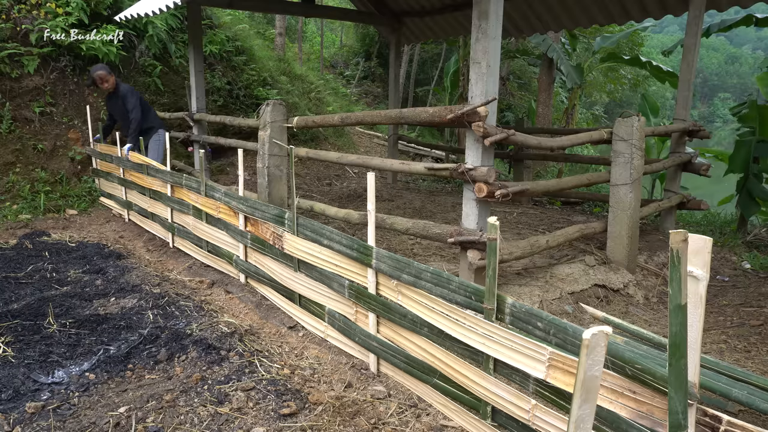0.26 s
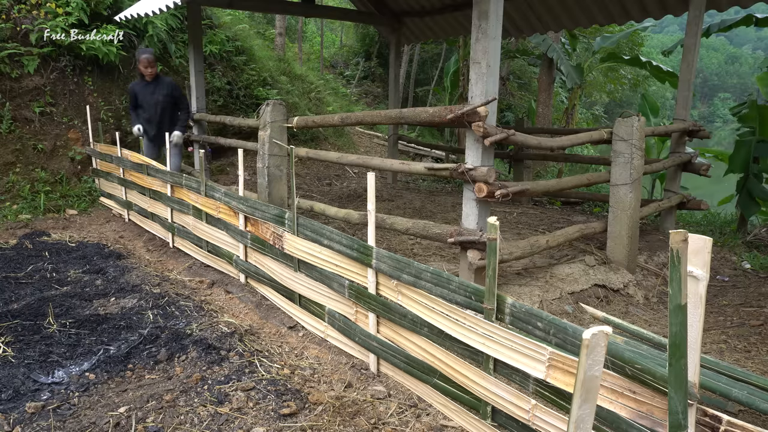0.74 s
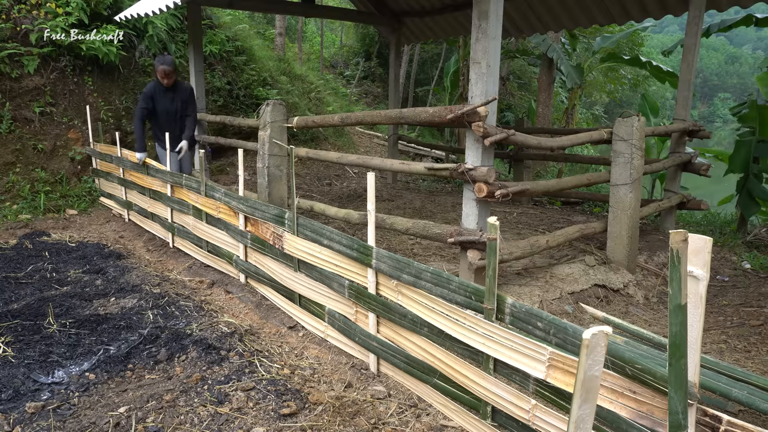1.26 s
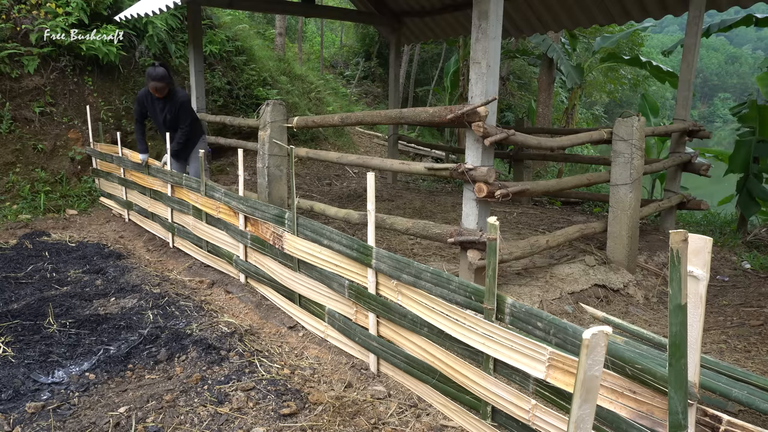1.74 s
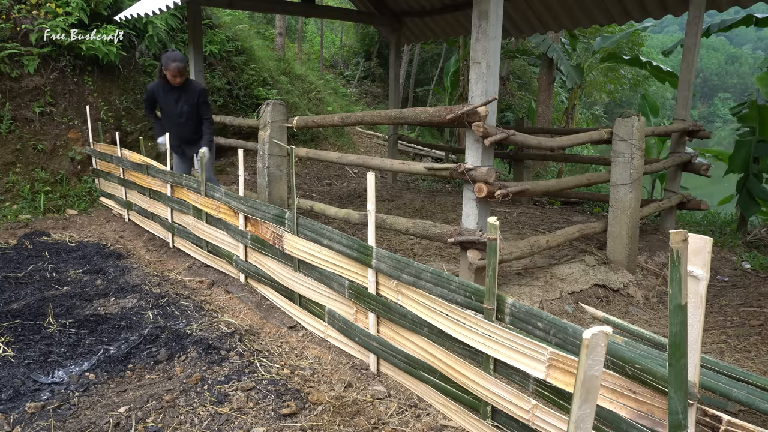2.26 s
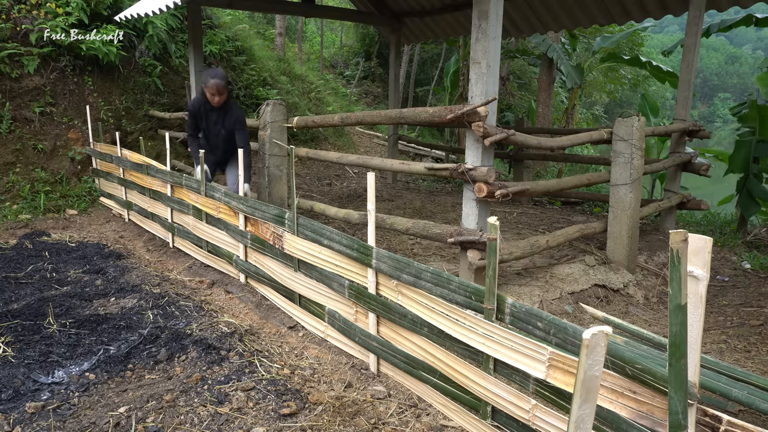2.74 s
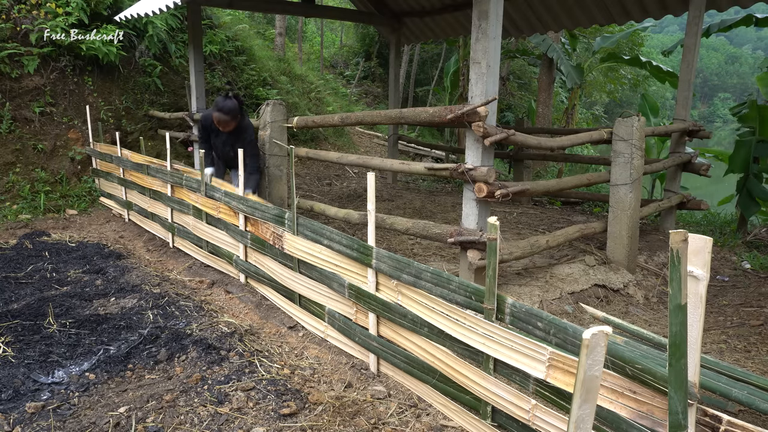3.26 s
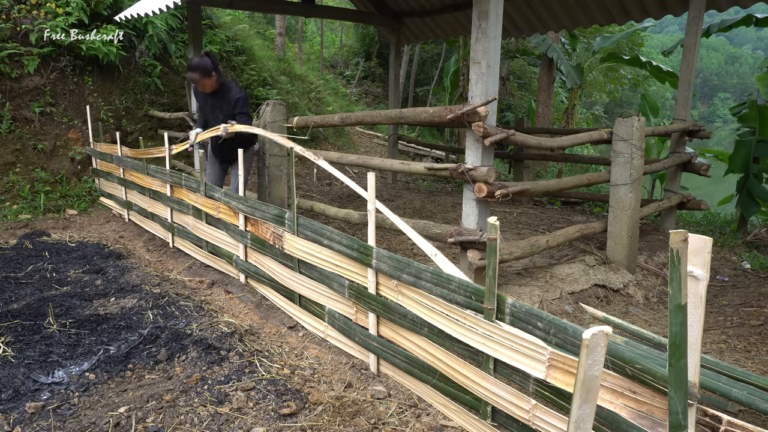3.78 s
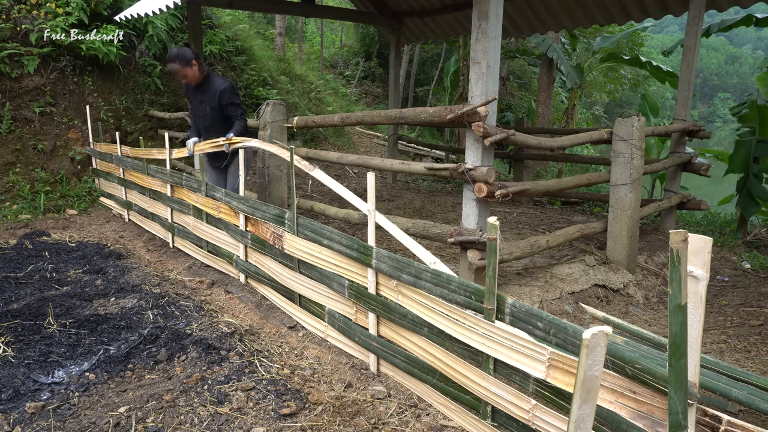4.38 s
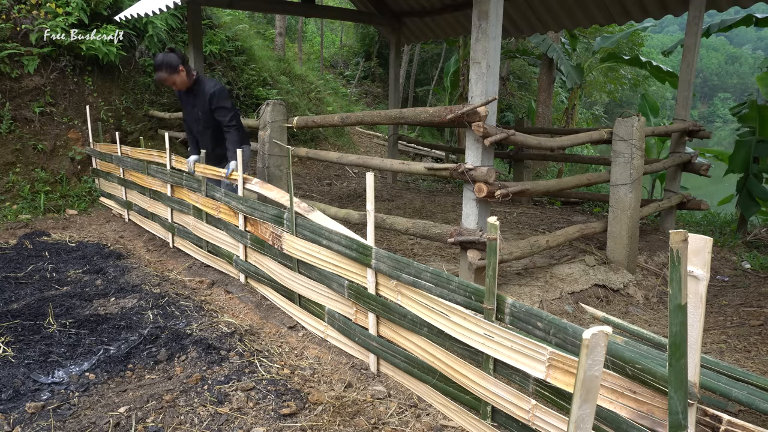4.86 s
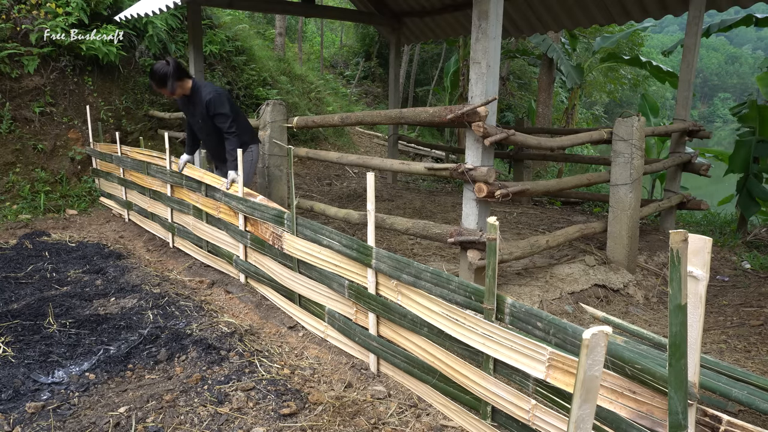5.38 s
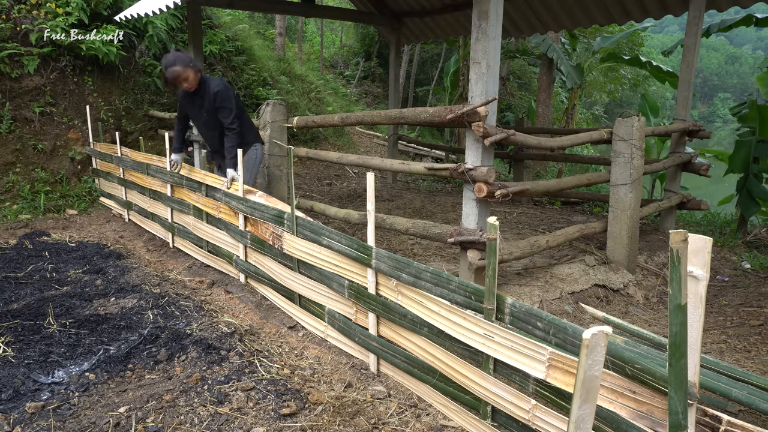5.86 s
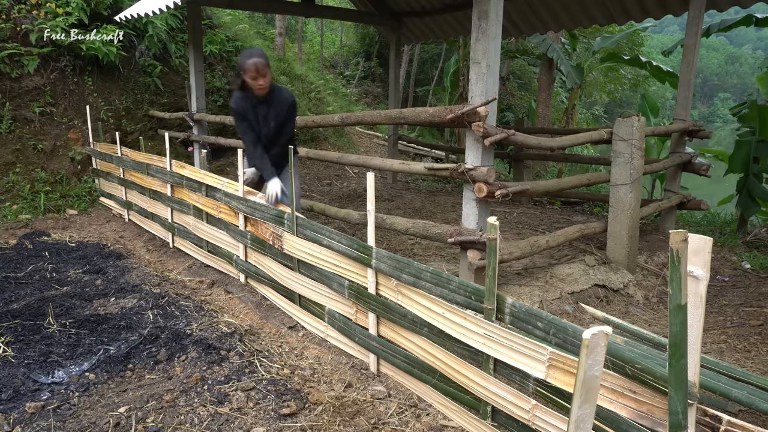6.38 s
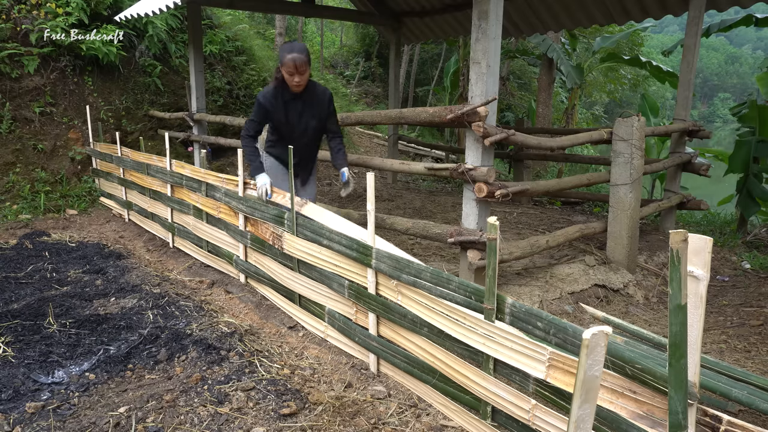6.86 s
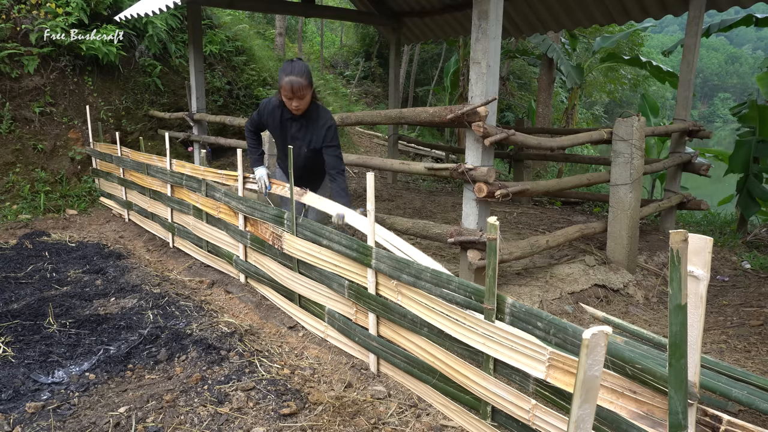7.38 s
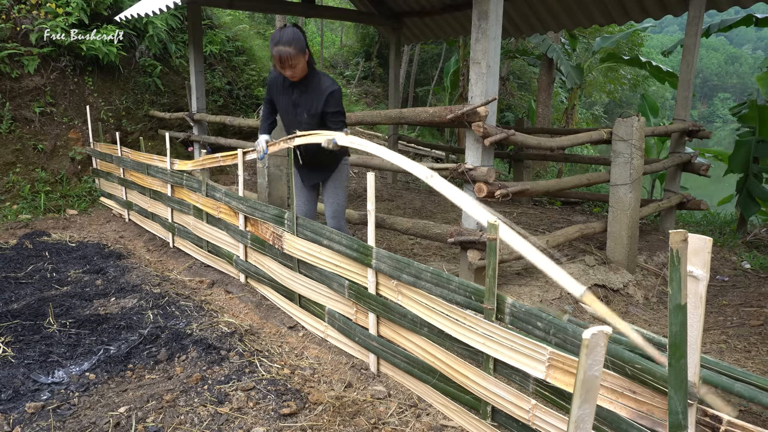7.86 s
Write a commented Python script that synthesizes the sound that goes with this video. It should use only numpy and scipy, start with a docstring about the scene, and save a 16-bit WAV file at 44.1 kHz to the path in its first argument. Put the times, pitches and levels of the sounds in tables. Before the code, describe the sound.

Split bamboo strip rasps, cracks and squeaks as it is bent between fence stakes, then clatters down hollowly over a high insect drone.

```python
"""A split bamboo strip is woven between the stakes of a fence, under an open shed roof on a quiet hillside.
Filtered noise makes still air and an insect chorus all through; pushes of the strip fizz and rasp as grains of noise.
Its fibres crack in short noise bursts, its skin squeaks as narrow bands of noise, and one dry crackle is clicks.
It knocks on hollow slats, made of noise bursts and decaying sines; a far bird whistles in gliding bands of noise.
At last the free end clatters down in a run of knocks. The roof adds a faint echo to the cracks, knocks and squeaks."""
import sys
import numpy as np
from scipy import signal
from scipy.fft import rfft, irfft
from scipy.io import wavfile

SR = 44100
rng = np.random.default_rng(int(sys.argv[2]) if len(sys.argv) > 2 else 0)


def transcribe(signal):
    """Save signal, clipped to [-1, 1], as a 16-bit WAV file at the path in sys.argv[1]."""
    frames = np.atleast_2d(signal).T
    limited = np.clip(frames, -1, 1)
    pcm = np.round(limited * 32767).astype(np.int16)
    wavfile.write(sys.argv[1], SR, pcm)


N = 358091
TIME = np.arange(N) / SR  # seconds

# tone colour of a blow on the fence: pitch_hz [Hz], level_db [dB per Hz]
BLOW_COLOUR = [(40, -31.5), (130, -5), (300, -3), (620, -0.5), (1000, -2.5), (2200, -8), (3500, -10),
               (6000, -9.5), (15000, -15.5)]


def gain_of(db):
    """Turns decibels into a factor."""
    return 10 ** (np.asarray(db) / 20)


def evened(x):
    """Scales a signal to an rms (average strength) of 1."""
    return x / np.sqrt(np.mean(x ** 2) + 1e-20)


def read(points, hz):
    """Reads a curve of (Hz, value) points on a log-frequency axis."""
    f, value = np.transpose(points)
    return np.interp(np.log(hz + 1), np.log(f + 1), value)


def add(mix, start_s, sound):
    """Mixes a sound in at a given time."""
    part = mix[:, max(round(start_s * SR), 0):][:, :sound.shape[1]]
    part += sound[:, :part.shape[1]]


def placed(pair, same, pan_db):
    """Makes two unrelated signals partly alike (same: 0 to 1) and pans them; positive pan_db is left."""
    same = np.clip(same, 0, 1)
    right = same * pair[0] + np.sqrt(1 - same ** 2) * pair[1]
    return np.array([pair[0] * gain_of(pan_db / 2), right * gain_of(-pan_db / 2)])


def coloured(x, *spectra, ripple_db=0, size=2048, order=24):
    """Filters without pre-echo; random ripple stands for the resonances of the spot that is touched."""
    hz = np.fft.rfftfreq(size, 1 / SR)
    ripple = evened(np.convolve(rng.standard_normal(len(hz)), np.hanning(order), "same"))
    total_db = sum(read(points, hz) for points in spectra) + ripple_db * ripple
    log_gain = np.log(gain_of(total_db))
    # minimum phase: the phase follows from the log gain around the whole circle
    circle = np.concatenate([log_gain, log_gain[-2:0:-1]])
    taps = np.fft.ifft(np.exp(np.conj(signal.hilbert(circle)))).real
    return signal.oaconvolve(x, taps[None], axes=1)[:, :x.shape[1]]


def sized(x, db):
    """Gives a hit the energy that a steady sound at this level has in 10 ms."""
    energy = np.mean(np.sum(x ** 2, 1))
    return gain_of(db) * x * np.sqrt(.01 * SR / energy)


def whistle(length_s, start_hz, end_hz, width_hz):
    """A fuzzy tone: noise in one gliding narrow band, faded in and out."""
    n = int(length_s * SR)
    band = 1 / (1 + (2 * np.fft.fftfreq(n, 1 / SR) / width_hz) ** 4)
    wobble = np.fft.ifft(np.fft.fft(rng.standard_normal((2, n))) * np.sqrt(band))
    turn = np.exp(2j * np.pi * np.cumsum(np.linspace(start_hz, end_hz, n)) / SR)
    fade = signal.windows.tukey(n, min(.6, 0.38 / length_s))
    return evened((wobble * turn).real * fade)


def scattered(x, decay_s, same):
    """The same energy thrown back by the slats around, within a few hundredths of a second."""
    t = np.arange(SR // 8) / SR
    echoes = placed(rng.standard_normal((2, len(t))), same, 0) * np.exp(-t / decay_s)
    return signal.fftconvolve(x, echoes / np.linalg.norm(echoes[0]), axes=1)[:, :x.shape[1]]


def slips(length_s, release_s, grain_db, same, pan_db):
    """A burst of noise in tiny uneven slips, the first ones strongest."""
    t = np.arange(SR // 4) / SR
    # a new random strength every 20 samples
    uneven = np.repeat(np.clip(rng.standard_normal(len(t)), -2, 2), 20)[:len(t)]
    onset = 1 + np.exp(-t / 0.00015)
    burst = np.exp(-np.maximum(t - length_s, 0) / release_s) * gain_of(grain_db * uneven) * onset
    return placed(rng.standard_normal((2, len(t))), same, pan_db) * burst


def slat_ring(favoured_hz=600, favour_db=0, detune=0.0025):
    """The decaying tones of a slat; the spot that is struck favours those near one pitch."""
    # what the slats ring with: pitch_hz [Hz], level_db [dB, relative], t60_s [s to fall by 60 dB]
    slat_modes = [(358, -18, 0.12), (436, -34, .1), (505.6, -5, 0.22), (554, -26, 0.087), (616, -4, 0.13),
                  (651.5, -8.5, 0.21), (705, 3, 0.053), (792, -2.5, 0.11), (834, 0.5, 0.052),
                  (1048, -16.5, 0.12), (1287, 5, 0.065), (1430, -16, 0.075), (1526, -21, .05),
                  (2004, 0, 0.077), (2343, 5, .05), (2830, -9, 0.049)]
    t = np.arange(SR // 4) / SR
    ring = np.zeros(len(t))
    for hz, db, t60_s in slat_modes:
        favour = favour_db * np.exp(-(np.log(hz / favoured_hz) / 0.068) ** 2)
        turns = hz * (1 + detune * rng.standard_normal()) * t + rng.random()
        ring += gain_of(db + favour - 60 * t / t60_s) * np.sin(2 * np.pi * turns)
    return ring / np.linalg.norm(ring)


def background():
    """Still air with a low rumble and insects all around: noise shaped into wide and narrow bands."""
    # colour of the air: pitch_hz [Hz], level_db [dB per Hz, relative]; the last point is left out below
    air_colour = [(12, -31), (20, -6.5), (59, -4.5), (212, -9.5), (282, -10.5), (326, -9), (368, -11.5),
                  (405, -12), (468, -11), (610, -11.5), (2650, -20), (3540, -19.5), (3800, -21),
                  (6300, -25), (8190, -73), (13900, -120)]
    # how alike the air is at both ears: pitch_hz [Hz], likeness [0 to 1]
    air_same = [(60, 1), (130, 0.87), (290, 0.53), (640, 0.083), (1400, 0.026), (16000, 0.045)]
    # colour of the insect chorus: pitch_hz [Hz], level_db [dB per Hz, relative]
    chorus_colour = [(5800, -55), (6650, -23), (7020, -4.5), (7400, 2), (7700, -7), (7900, 2), (8050, -4),
                     (8300, -2.5), (8750, -4.5), (9050, -18), (9400, -28), (16000, -27)]
    # single insects: start_s [s], end_s [s], pitch_hz [Hz], width_hz [Hz], level_db [dB rms]
    insects = [(0, 9.1, 7750, 50, -60), (.65, 1.45, 4980, 250, -79), (2.3, 3.22, 3500, 170, -68)]
    # faint low hums: start_s [s], end_s [s], pitch_hz [Hz], width_hz [Hz], level_db [dB rms]
    drones = [(1.6, 3.8, 66.3, 3.6, -65), (6.85, 7.6, 37.9, 9, -59)]
    hz = np.fft.rfftfreq(N, 1 / SR)
    white = rfft(rng.standard_normal((2, N)))
    air_db = read(air_colour[:-1], hz) + read([(6000, 2), (10000, -9), (16000, -7)], hz)
    air = irfft(placed(white, read(air_same, hz), 0) * gain_of(air_db), N)
    chorus = irfft(rfft(rng.standard_normal((2, N))) * gain_of(read(chorus_colour, hz)), N)
    # the chorus flutters at random, mostly slower than 25 times a second
    throb = evened(irfft(rfft(rng.standard_normal((2, N))) / (1 + (hz / 25) ** 2), N))
    chorus = placed(chorus * gain_of(1.6 * throb), 0, pan_db=1.5)
    out = gain_of(-56) * evened(air) + gain_of(-48.0) * evened(chorus)
    for tones, same in ((insects, 0), (drones, .98)):
        for start_s, end_s, tone_hz, width_hz, db in tones:
            tone = whistle(end_s - start_s, tone_hz, tone_hz, width_hz)
            add(out, start_s, gain_of(db) * placed(tone, same, 0))
    return out


def pushing():
    """Each push gathers speed, holds and dies away; gives the strength of the rasp and of the fizz."""
    # pushes along the fence: start_s [s], rise_s [s], hold_s [s],
    # rasp_db [dB, before the mix in sliding()], fizz_db [dB over the rasp, before the same mix]
    pushes = [(0.088, 0.027, 0.035, -53.5, -3.5), (0.261, 0.027, 0.029, -62.5, 3.5),
              (0.41, .02, .08, -65.5, 2.5), (1.46, 0.064, 0.29, -54, -1), (1.811, 0.044, 0.036, -48, 2.5),
              (2.077, 0.034, 0.066, -49, -7.5), (2.268, 0.025, 0.018, -52.5, 4.5), (3.13, .02, .03, -61, 2),
              (3.213, 0.17, 0.072, -45, 3.5), (3.411, 0.032, .015, -40.5, -1.5),
              (3.485, 0.036, .27, -51.5, 0), (3.84, 0.055, 0.21, -50, 2), (4.138, .03, 0.061, -51, 4),
              (4.294, 0.016, .03, -53.5, 1), (4.37, .04, 0.053, -51.5, 4), (4.526, 0.1, 0.066, -46.5, 4),
              (4.703, .04, 0.075, -51.5, 6), (4.864, 0.029, .19, -45.5, 1.5),
              (5.128, 0.043, 0.095, -45.5, -4), (5.27, .03, 0.064, -57, -12),
              (5.546, 0.037, 0.065, -43.5, -1.5), (5.7, 0.027, 0.093, -55.5, -3),
              (6.27, .04, 0.23, -64.5, -3), (6.508, 0.027, 0.2, -52.5, -7), (6.792, 0.046, 0.057, -47, 2),
              (6.927, 0.034, 0.088, -52, -14), (7.048, 0.028, 0.56, -59.5, 0),
              (7.53, 0.058, .25, -47.5, -1), (7.933, 0.012, 0.075, -43, -5)]
    release_db_per_s = 118  # the strip comes to rest after each push
    rest_rasp_db, rest_fizz_db = -69.5, -73  # the hands never keep quite still
    t = TIME[::64]  # a coarse clock is enough
    rasp, fizz = gain_of(rest_rasp_db) ** 2, gain_of(rest_fizz_db) ** 2
    for s, rise_s, hold_s, db, fizz_db in pushes:
        after_s = np.maximum(t - s - rise_s - hold_s, 0)
        push = np.clip((t - s) / rise_s, 0, 1) * gain_of(db - release_db_per_s * after_s)
        rasp = rasp + push ** 2
        fizz = fizz + (gain_of(fizz_db) * push) ** 2
    return np.interp(TIME, t, np.sqrt(rasp)), np.interp(TIME, t, np.sqrt(fizz))


def grains(colour, per_s, spread_db, smooth_db, same, pan_db, count=8):
    """Many fibres catching, in groups with their own resonances, over a smoother rub."""
    out = np.zeros((2, N))
    for _ in range(count):
        starts = rng.exponential(1, N), rng.random(N) < per_s / count / SR
        size = gain_of(spread_db * np.minimum(starts[0], 4)) * starts[1]
        # each catch dies away in 0.65 ms
        catch = evened(signal.lfilter([1], [1, -np.exp(-1 / (0.00065 * SR))], size))
        rub = (catch + gain_of(smooth_db)) * rng.standard_normal((2, N))
        out += coloured(placed(rub, same, pan_db), colour, ripple_db=1.5)
    return out / np.std(out.mean(0))


def sliding(rasp, fizz):
    """The moving strip fizzes, rasps and shakes the slats: grains of noise that follow the pushes."""
    # how much the fence shakes for a push: rasp_db [dB], shaking_db [dB, before the mix of low sounds]
    shake_curve = [(-75.5, -73.5), (-52, -55), (-44.5, -49), (-35, -48)]
    # colour of the fizz: pitch_hz [Hz], level_db [dB per Hz, relative]
    fizz_colour = [(1500, -22.5), (4000, -10.5), (6200, -4.5), (9000, 0), (11000, -5), (13000, -4.5),
                   (16000, -13)]
    # colour of the rasp: pitch_hz [Hz], level_db [dB per Hz, relative]
    rasp_colour = [(300, -19.5), (650, -3), (950, -3.5), (1500, -0.5), (2400, 1.5), (4000, -3.5),
                   (6500, -7.5), (10000, -11), (16000, -18)]
    shake = gain_of(np.interp(20 * np.log10(rasp), *np.transpose(shake_curve)))
    # it moves in small jerks, some tens a second
    hz = np.fft.rfftfreq(N, 1 / SR)
    unsteady = irfft(rfft(rng.standard_normal(N)) * ((hz > 10) & (hz < 45)), N)
    jerks = evened(gain_of(1.6 * evened(unsteady)))
    fibres = grains(fizz_colour, per_s=750, spread_db=1.0, smooth_db=2.5, same=0.034, pan_db=6.5)
    edges = grains(rasp_colour, per_s=630, spread_db=1.5, smooth_db=3.0, same=0.7, pan_db=0.0)
    bumps = grains(BLOW_COLOUR, per_s=220, spread_db=0, smooth_db=-3.0, same=0.79, pan_db=-0.5)
    slats = evened(signal.oaconvolve(bumps, slat_ring()[None], axes=1)[:, :N])
    thuds = coloured(bumps, [(150, 1.5), (300, 6.0), (600, -2.5), (1100, -2)])
    low = gain_of(-9.0) * slats + gain_of(-2.5) * thuds
    return jerks * (gain_of(2.0) * fizz * fibres + gain_of(-0.5) * rasp * edges + shake * low)


def crack(db, length_s, body_db, edge_db, pan_db):
    """A bent fibre lets go in a short bright burst of noise."""
    # colour of a crack: pitch_hz [Hz], level_db [dB per Hz, relative]
    crack_colour = [(80, -23), (300, -14.5), (700, -8.5), (1400, -7), (2400, 0.5), (4200, -2), (6000, -0.5),
                    (8000, 5), (10500, 1.5), (13000, -4.5), (16000, -7)]
    burst = slips(length_s, release_s=.0004, grain_db=4, same=.8, pan_db=0)[:, :SR // 8]
    # the treble is hardly thrown back
    thrown_back = scattered(burst, decay_s=.01, same=.5)
    burst = burst + coloured(thrown_back, [(1500, -2), (5000, -6), (11000, -9)])
    tilt = [(2800, body_db), (5000, 0), (8500, 0), (11500, edge_db)]
    sound = coloured(burst, crack_colour, tilt, ripple_db=2)
    # only the treble is weaker on the right
    sound[1:] = coloured(sound[1:], [(1200, 0.33), (3000, -pan_db / 2), (6000, -pan_db)])
    return sized(sound, db + .5)


def cracks():
    """The loud cracks, each from the place where the strip is being bent."""
    # the loudest fibres letting go: start_s [s], level_db [dB spread over 10 ms, before a 0.5 dB lift],
    # length_s [s], body_db [dB, below 2.8 kHz], edge_db [dB, above 11.5 kHz]
    crack_list = [(0.12, -34, 0.042, -1.5, -17), (1.538, -30.5, 0.0091, 2, 3.5), (1.655, -34, 0.026, -4, 3),
                  (1.672, -32.5, 0.012, -2, -11), (1.753, -40, 0.01, 10, 3), (2.11, -40.5, 0.015, 11, -20),
                  (2.314, -28, 0.013, -1, 6), (3.208, -36.5, 0.00087, -8.5, 6),
                  (3.31, -31.5, 0.0061, 1, 0.5), (3.492, -34, 0.0012, 2, 11), (3.607, -36, 0.0014, -2, -1),
                  (3.71, -37.5, 0.0045, -2, 11), (3.87, -31.5, 0.0021, 3, 11.5),
                  (3.9315, -34, 0.0034, -19, -12), (4.014, -25.5, 0.0054, 1.5, 6),
                  (4.035, -29.5, 0.0033, -4, 6), (4.092, -36.5, .002, -28, -3),
                  (4.13, -31.5, .001, -36, -10), (4.165, -30.5, .005, -5.5, 10),
                  (4.2, -33, 0.0081, -4, -0.5), (4.2926, -29, 0.0072, -3.5, -2), (4.565, -34, .004, -9, -4),
                  (4.629, -31.5, .01, -6, -11), (4.783, -24.5, .0054, 1, 15.5),
                  (4.814, -32.5, 0.0011, -0.5, 5), (4.881, -29, .002, 8.5, 17),
                  (4.888, -24, 0.00064, -23, 9.5), (4.965, -32, 0.0016, -11, 14),
                  (5.011, -32, 0.0026, 5, 12), (5.066, -28.5, 0.0042, 2.5, 7.5),
                  (5.167, -28.5, .007, -0.5, -6), (5.531, -37.5, 0.0051, -5, -4),
                  (5.583, -22.5, 0.0049, -4, -2), (5.592, -30, 0.011, -4, -9), (6.547, -30, 0.0062, -1, -7),
                  (6.632, -35.5, 0.0055, 2.5, -2), (6.696, -34, 0.0074, -1, -18),
                  (6.837, -35.5, .006, -9, 0), (6.876, -27.5, 0.0032, 7, 14.5),
                  (6.943, -34.5, 0.0028, -6, 5), (7.462, -41, 0.0014, -5, 10), (7.57, -26, 0.0015, 3.5, 4),
                  (7.617, -27.5, 0.008, 5.5, 1.5), (7.662, -33, 0.0018, 6, -5),
                  (7.705, -21.5, 0.0041, -1, 0)]
    # they move from the left towards the middle as the weaving goes on: time_s [s], left_right_db [dB]
    crack_pan = [(0, 12), (5.6, 10.5), (6.9, 5.5), (7.7, 2)]
    out = np.zeros((2, N))
    for s, db, length_s, body_db, edge_db in crack_list:
        pan_db = np.interp(s, *np.transpose(crack_pan))
        add(out, s, crack(db, length_s, body_db, edge_db, pan_db))
    return out


def snaps(fizz, count=12):
    """Small cracks of a dozen fibres, at random moments, growing with the push that bends them."""
    snaps_per_s, over_fizz_db, spread_db = 22, 7.5, 5.5
    typical_s, colour_db = 0.0022, 5.5
    top_db = -39  # a small fibre gives way at about this level, however hard the push
    out = np.zeros((2, N))
    strength = np.minimum(fizz * gain_of(over_fizz_db), gain_of(top_db))
    fibres = [crack(0, typical_s * np.exp(a / 2), colour_db * b - 7, colour_db * c - 3, pan_db=10)
              for a, b, c in rng.standard_normal((count, 3))]
    for k, (when, size) in enumerate(rng.random((int(snaps_per_s * N / SR), 2))):
        s = (k + when) / snaps_per_s
        level = np.interp(s, TIME, strength) * gain_of(spread_db * (2 * size - 1.5))
        add(out, s, level * fibres[k % count])
    return out


def squeaks():
    """The skin sticks and slips on a stake: high squeaks at the hands, low groans towards the free end."""
    # squeaks and groans: start_s [s], level_db [dB rms], length_s [s], pitch_hz [Hz], width_hz [Hz]
    squeak_list = [(0.305, -47, .014, 5570, 1200), (2.026, -40, 0.0096, 5450, 1000),
                   (3.124, -51.5, 0.021, 5740, 900), (3.442, -31, .032, 6030, 2400),
                   (5.249, -33, 0.023, 6270, 1900), (5.612, -33.5, 0.0084, 6140, 900),
                   (5.816, -47.5, 0.026, 5650, 1500), (6.926, -45.5, 0.021, 846, 150),
                   (7.636, -43, 0.0252, 813, 110), (7.711, -46, 0.021, 810, 140),
                   (7.769, -39, 0.0088, 6150, 1800), (7.796, -46.5, 0.056, 832, 90.4)]
    sag = 0.013  # each starts this share above its pitch and ends as far below
    out = np.zeros((2, N))
    for s, db, length_s, hz, width_hz in squeak_list:
        pan_db = read([(800, -3), (6000, 9)], hz)
        same = read([(800, 0.82), (6000, 0.55)], hz)
        tone = whistle(length_s, hz * (1 + sag), hz * (1 - sag), width_hz)
        add(out, s, gain_of(db) * evened(placed(tone, same, pan_db)))
    return out


def tick(start_s=.497, length_s=0.0059, db=-35, count=5):
    """One dry, close crackle: a handful of clicks with no ring."""
    clicks = np.zeros((2, SR // 20))
    at = (np.arange(count) + .7 * rng.random(count)) / count * length_s * SR
    clicks[:, at.astype(int)] = rng.uniform(0.54, 1, count)
    colour = [(150, -24), (600, 2.5), (1400, 3.5), (3500, 0.0), (7000, -4.0), (16000, -24)]
    crackle = coloured(clicks, colour)
    out = np.zeros((2, N))
    add(out, start_s, sized(placed(crackle, 0.98, pan_db=5.5), db))
    return out


def knocks():
    """The strip chatters against a slat: a first tap, a dull blow and a short hollow ring."""
    # blows on the slats: start_s [s], level_db [dB spread over 10 ms, before a 1.9 dB lift],
    # contact_s [s], thump_db [dB, near 330 Hz], hardness_db [dB, 1.3 to 2.8 kHz],
    # favoured_ring_hz [Hz], left_right_db [dB, positive is left]
    knock_list = [(0.65, -53, 0.0086, 2, -4, 720, 1), (1.349, -51, 0.018, 1, -9, 780, 2),
                  (2.617, -40.5, 0.015, 3.5, -7.5, 547, 1), (3.834, -40.5, 0.016, 10, -6.5, 450, -2),
                  (4.018, -43, .006, -4, 5, 630, -2), (4.036, -39.5, 0.0077, 1.5, -2, 620, -2),
                  (4.811, -39, .004, -1, 2, 710, 0), (4.882, -36, 0.017, 11.5, 5, 760, 0),
                  (5.124, -31, 0.0093, 1, 13, 626, -10), (5.141, -37, 0.0078, 4, -7, 614, -1),
                  (6.293, -47.5, 0.015, 3, -8, 656, 0), (6.931, -37.5, 0.0052, -14, -5.5, 810, -4),
                  (6.975, -36, 0.012, -18, 7, 774, -9), (7.376, -37.5, 0.019, -14, 4.5, 576, -9),
                  (7.401, -42.5, 0.0074, -15, -8, 610, -1), (7.512, -45.5, .0035, 14, 1, 390, -4),
                  (7.567, -43.5, 0.011, 3, 3, 620, 1), (7.709, -34.5, 0.017, -1, -2.5, 800, -1),
                  (7.742, -37, 0.0023, 6, -8, 566, -1.5), (7.844, -40, 0.007, -17, 7, 826, -8),
                  (7.938, -24, 0.0122, -2, 3.5, 603, -6), (7.955, -24.5, 0.0022, -3, -13, 650, -1),
                  (7.97, -37, 0.018, 6, -25, 620, 0), (8.012, -29, 0.004, -3.5, -8, 667, -4),
                  (8.034, -26, 0.0098, -15, 3.5, 606, -11), (8.046, -29.5, 0.0074, 1, 4.5, 616, 2)]
    out = np.zeros((2, N))
    for s, db, contact_s, thump_db, hard_db, ring_hz, pan_db in knock_list:
        blow = slips(contact_s, release_s=0.001, grain_db=3.0, same=0.97, pan_db=pan_db)
        blow[:, 0] += .5 * np.linalg.norm(blow, axis=1)  # the first tap
        slat = slat_ring(ring_hz, favour_db=11.0)
        ring = signal.fftconvolve(blow, slat[None], axes=1)[:, :blow.shape[1]]
        blow = blow + gain_of(-2.5) * scattered(blow, decay_s=0.023, same=0.84)
        # the struck spot gives a broad, heavily damped resonance too
        spot = [(ring_hz / 1.22, 0), (ring_hz, 6), (ring_hz * 1.2, 0)]
        dull = evened(coloured(blow, BLOW_COLOUR, spot, ripple_db=1.2, order=10))
        knock = dull + gain_of(-5) * evened(ring)
        tilt = [(100, min(thump_db, 0) - 2.5), (330, thump_db), (560, 0), (900, 0.5),
                (1300, hard_db), (2800, hard_db), (5500, min(hard_db, 0) - 2.0)]
        add(out, s, sized(coloured(knock, tilt), db + 1.9))
    return out


def bird():
    """A far bird's short phrase of whistles: fuzzy gliding tones."""
    # notes: start_s [s], level_db [dB rms], length_s [s], start_hz [Hz], end_hz [Hz], width_hz [Hz]
    bird_notes = [(6.194, -61.5, 0.2, 2820, 3030, 200), (6.252, -57, 0.14, 3700, 3900, 150),
                  (6.358, -56, .21, 3900, 4010, 170), (6.566, -50.5, .09, 2430, 2630, 170),
                  (6.715, -57.5, 0.091, 1540, 1500, 90)]
    out = np.zeros((2, N))
    for s, db, length_s, start_hz, end_hz, width_hz in bird_notes:
        note = whistle(length_s, start_hz, end_hz, width_hz)
        add(out, s, gain_of(db) * placed(note, 0.27, pan_db=0))
    return out


def shed(x):
    """A thin tail from roof, posts and earth bank; treble dies first, bass reaches both ears alike."""
    taps = rng.standard_normal((2, SR // 2)) * (rng.random((2, SR // 2)) < 3000 / SR)  # sparse echoes
    hz, t, z = signal.stft(taps, SR, nperseg=256)
    z = placed(z, read([(300, 0.99), (700, 1.0), (2000, 0.27), (5000, 0.28)], hz)[:, None], 0)
    # seconds to fall by 60 dB, at each pitch
    t60_s = read([(300, 0.6), (2000, 0.25), (6000, 0.25), (14000, 0.049)], hz)[:, None]
    fading = z * gain_of(-60 * t / t60_s) * np.minimum(t / 0.0051, 1)
    tail = signal.istft(fading, SR, nperseg=256)[1]
    return signal.fftconvolve(x, tail / np.linalg.norm(tail[0]), axes=1)[:, :N]


def scene():
    """The bamboo, its echo under the roof and the hillside."""
    rasp, fizz = pushing()
    bamboo = cracks() + knocks() + squeaks()
    steady = sliding(rasp, fizz) + tick() + background() + bird()
    bamboo = bamboo + snaps(fizz)
    echo = gain_of(-13) * shed(bamboo)
    return bamboo + echo + steady


def record(dry):
    """A steep low-pass filter takes away what lies above about 16 kHz."""
    edge_hz = 16050
    low_pass = signal.firwin(301, edge_hz, window=("kaiser", 8), fs=SR)
    return signal.oaconvolve(dry, low_pass[None], "same")


dry = scene()
out = record(dry)
transcribe(out)
```